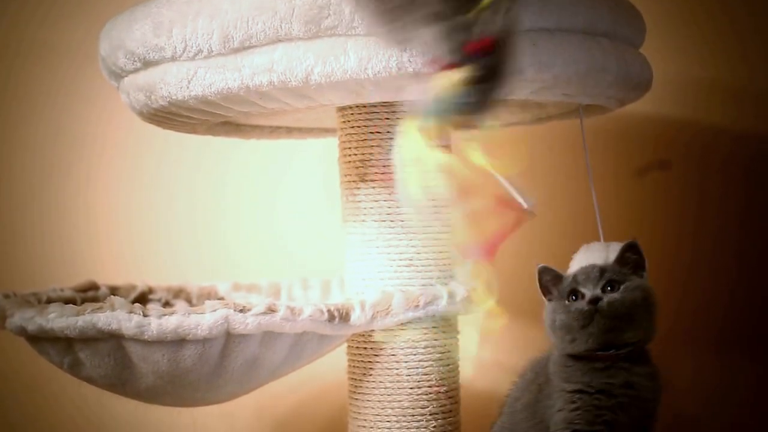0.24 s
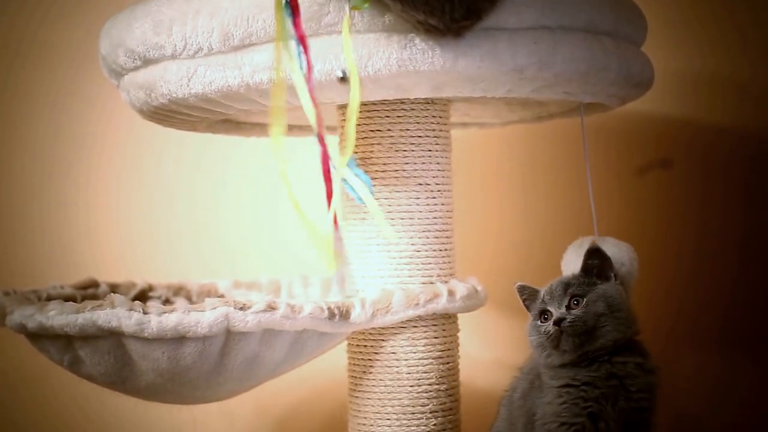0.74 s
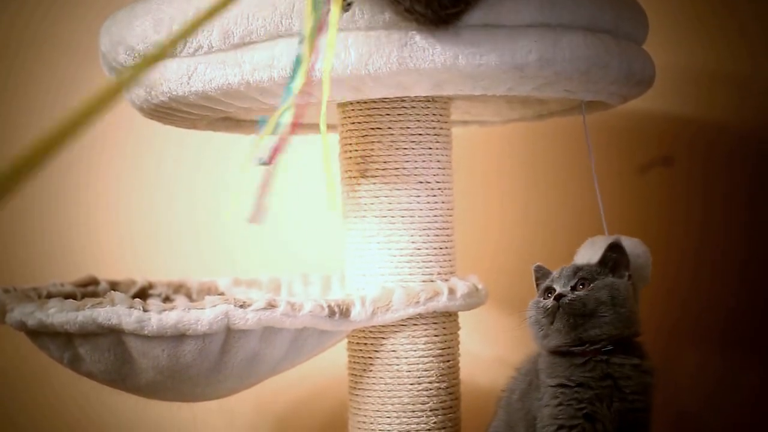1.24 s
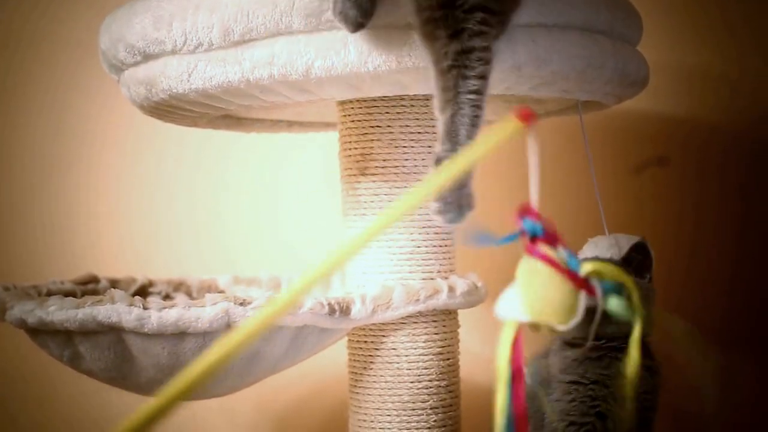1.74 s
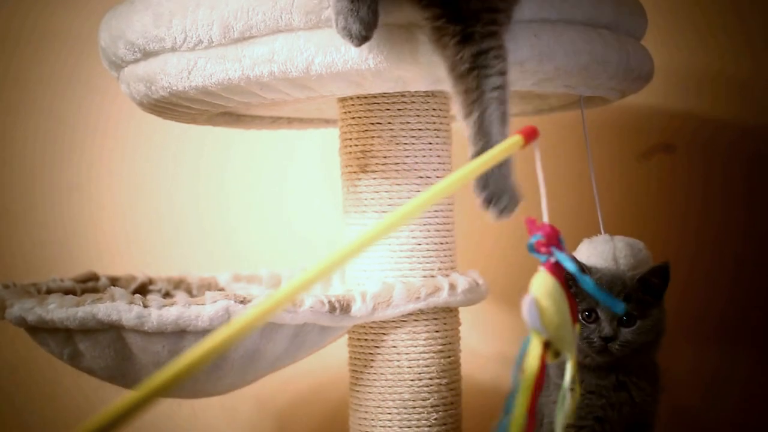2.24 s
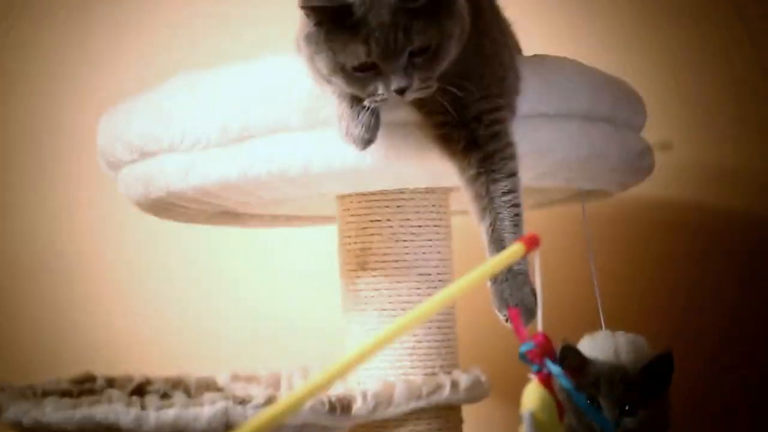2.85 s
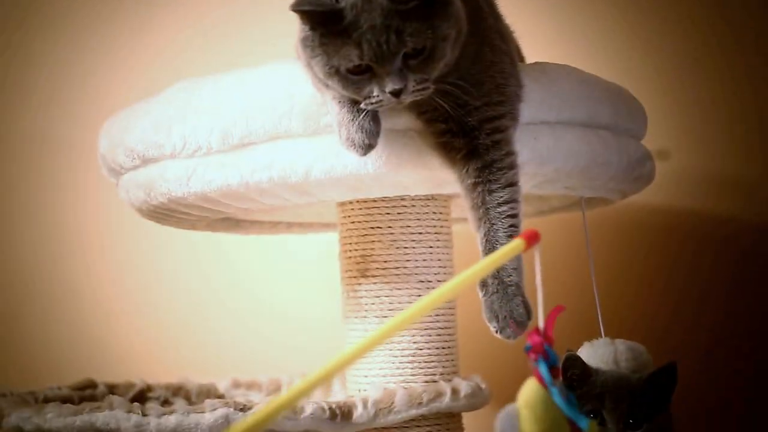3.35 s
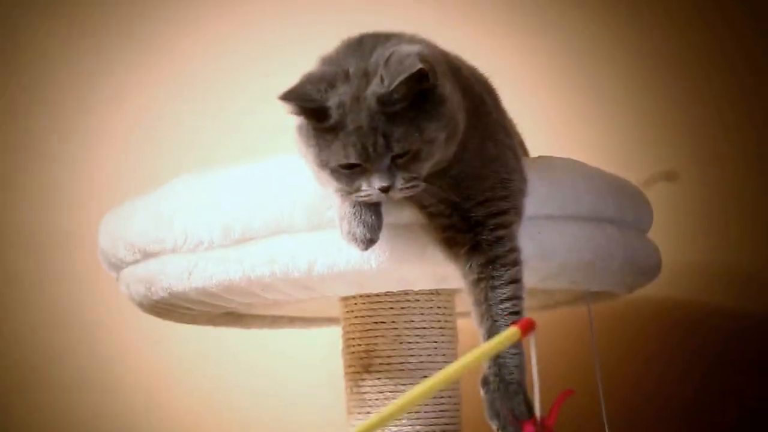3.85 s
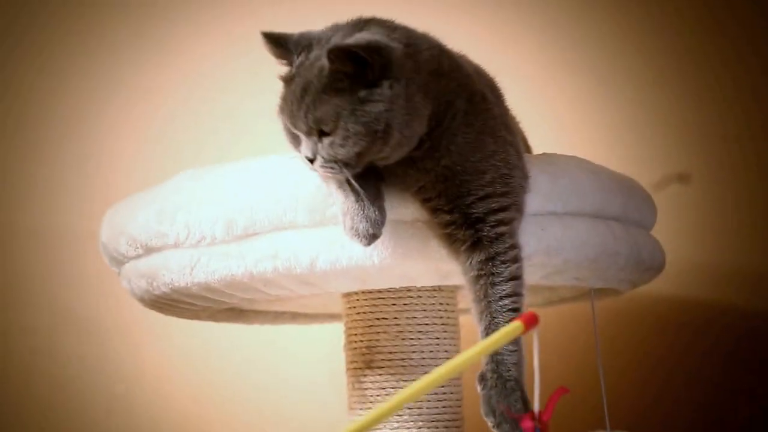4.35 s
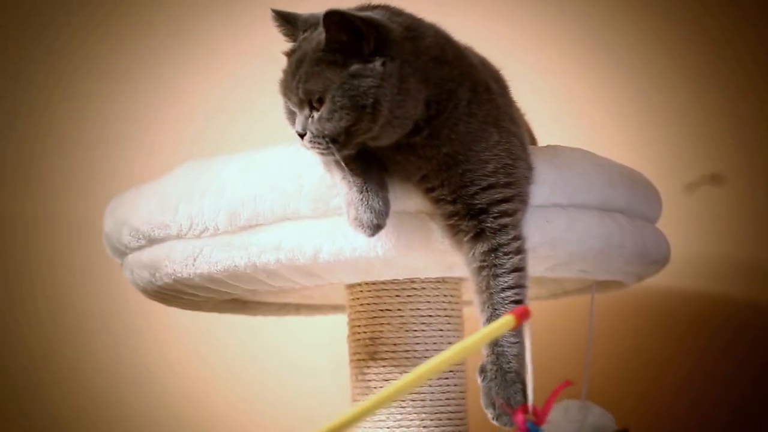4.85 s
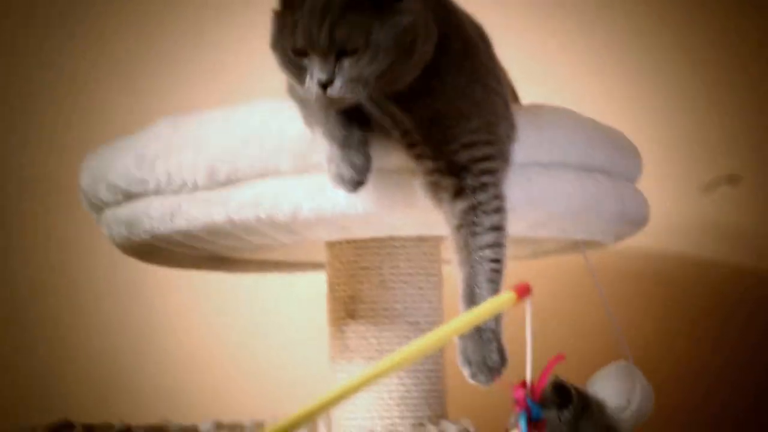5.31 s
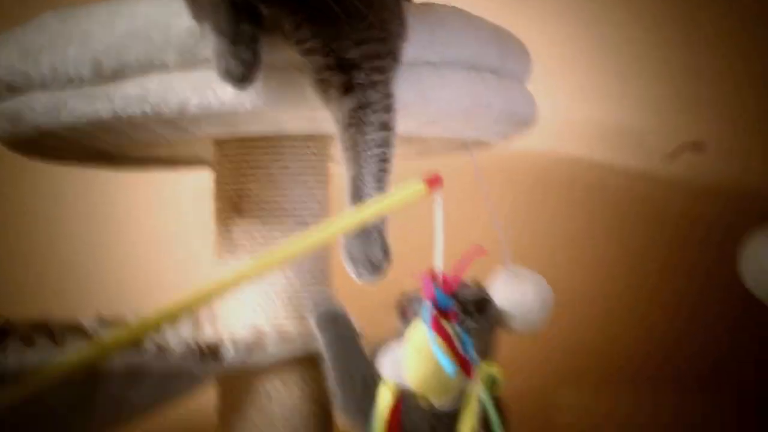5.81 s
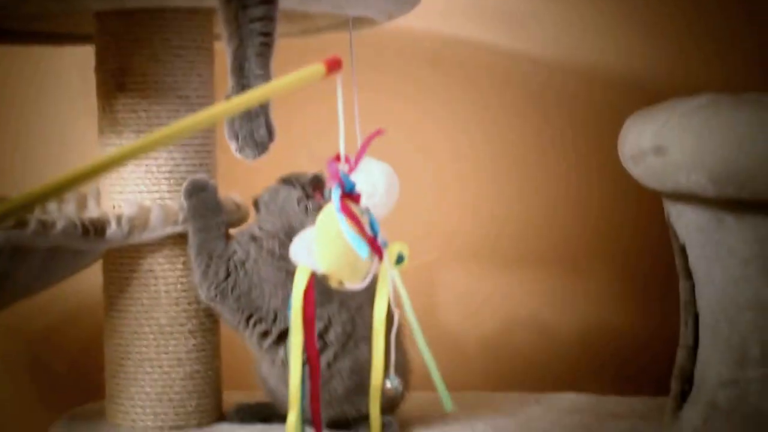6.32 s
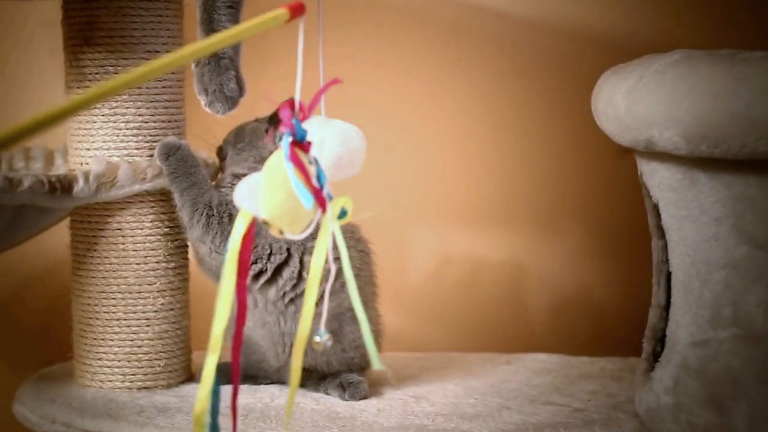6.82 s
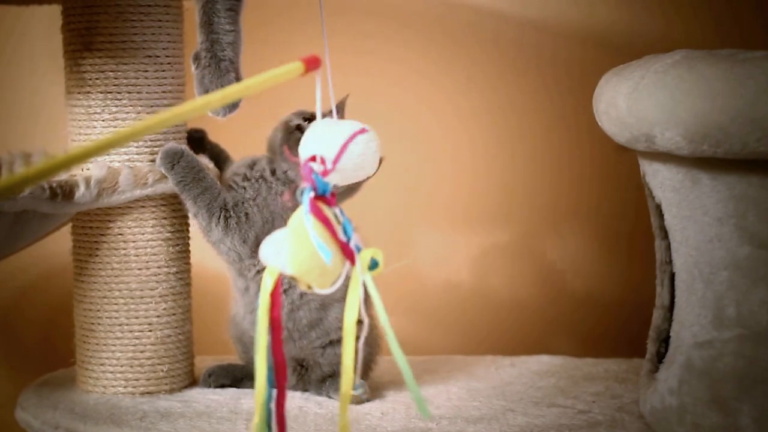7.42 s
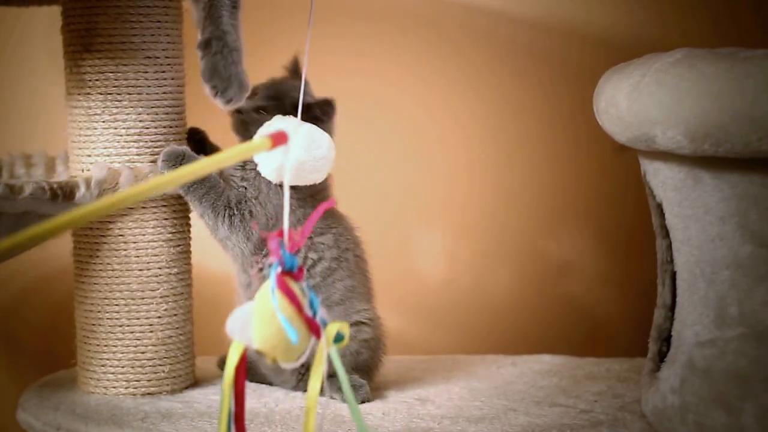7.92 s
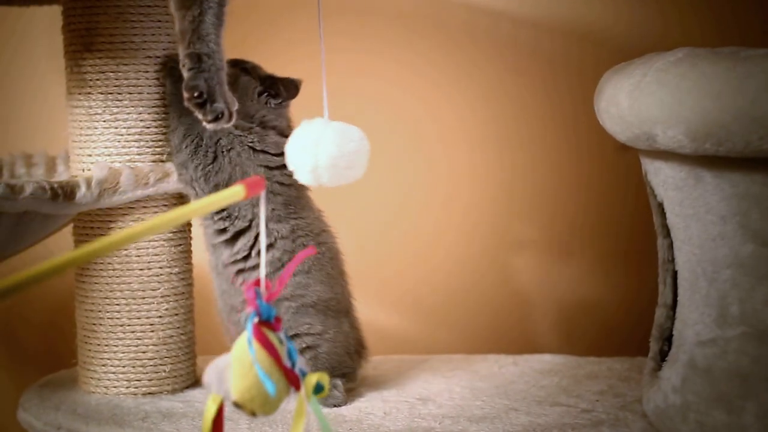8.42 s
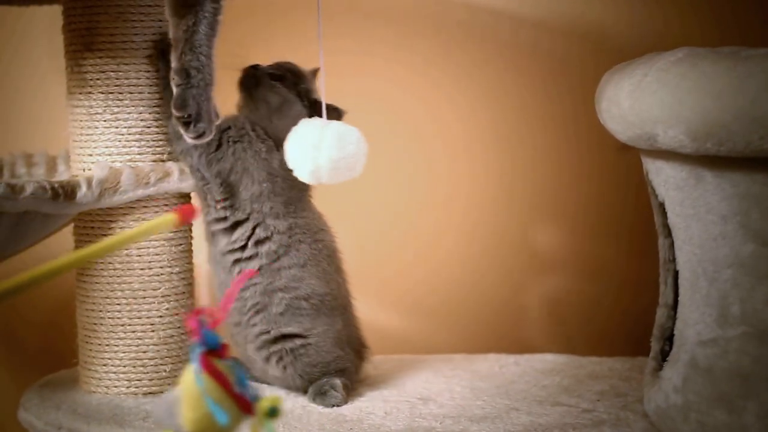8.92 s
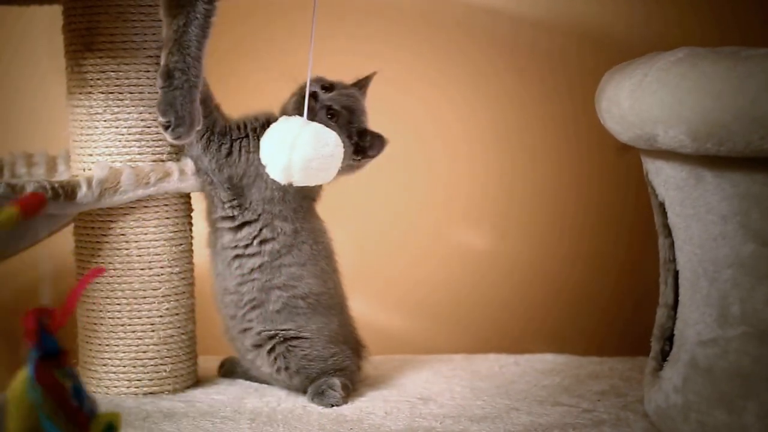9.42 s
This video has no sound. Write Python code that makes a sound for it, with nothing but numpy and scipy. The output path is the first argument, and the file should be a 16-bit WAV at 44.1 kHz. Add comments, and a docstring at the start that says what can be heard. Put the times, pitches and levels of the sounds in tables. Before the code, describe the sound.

A tiny bell on a cat toy tinkles and rattles in the first half second, again around 1.5 seconds with a soft paw thud, and faintly at 2. A wand stick taps the cat tree sharply at 2.2 seconds. At 2.8 a kitten's claw snaps loudly out of the rope post and rips briefly down it; another loud crack comes at 3.7. From about 4.4 to 6.6 seconds there is a busy flurry of claw snaps, ticks and taps, with short, stuttering, rasping rips thickest after 5.4, while the hollow post knocks along. From 7 seconds the play thins to a few light taps and muffled paw thuds, with a stick tap at 8.7 and a soft scuff on plush just after 9. Everything sounds fairly close, with a short echo in a quiet living room, over faint air hiss and a barely audible electrical whine.

```python
"""A quiet living room: kittens play with a wand toy on a cat tree.
A pellet tinkles in the toy's tiny bell and the stick taps the tree. Claws snap out of the sisal post
with a crack and rip down it in quick slips, one per turn of rope. The hollow post and its platforms
knock along, paws thud and scuff on the plush, and the walls echo over still air and a faint whine."""
import sys
import numpy as np
from scipy import signal
from scipy.fft import rfft, irfft, next_fast_len
from scipy.io import wavfile
from scipy.ndimage import uniform_filter1d, map_coordinates

SR = 44100
rng = np.random.default_rng(int(sys.argv[2]) if len(sys.argv) > 2 else 0)


def persist_wave(psi):
    """Save psi, clipped to +-1, as 16-bit WAV."""
    counts = np.round(np.clip(psi, -1, 1) * 32767).astype(np.int16)
    wavfile.write(sys.argv[1], SR, np.atleast_2d(counts).T)


N = 426178

# Modes of the post and its platforms. Each row: frequency in Hz, level in dB, t60 in seconds.
TREE_MODES = [(111.3, -31, 0.61), (140.3, -29, 0.33), (211, -18, 0.16), (260, -19, 0.078),
              (396.6, -13.5, 0.085), (520, -23.5, 0.045), (593.6, -10.5, 0.035), (763, -14.5, 0.083),
              (1190, -12, 0.068), (1413, -12.5, 0.047)]
# Colour of the sisal fibre. Each row: frequency in Hz, density in dB.
FIBRE_SPECTRUM = [(40, -45), (150, -7.5), (500, -2), (800, -1.5), (1030, -3), (1220, 1), (1600, -3.5),
                  (2100, 0.5), (2600, -1), (3300, -3), (4300, -8), (5300, -11), (6100, -24.5), (15000, -42)]
# Claw rips. Each row: start and end in seconds, slips per second, last gap over first gap, level in dB.
CLAW_DRAGS = [(2.805, 2.8448, 75, .6, -31.5), (2.8526, 2.905, 95, 1, -37), (2.927, 2.9423, 60, 1, -30.5),
              (3.7932, 3.8046, 75, 1, -30), (4.8526, 4.864, 68, 1, -28), (5.334, 5.348, 75, 1, -32.5),
              (5.391, 5.498, 47, 1.7, -26), (5.6317, 5.7183, 82, 0.97, -27),
              (5.9494, 6.0689, 76, 2.2, -24.5), (6.2538, 6.3933, 78, 1.6, -24.5),
              (6.422, 6.4488, 39, 1, -24.5), (6.4673, 6.5365, 88, 2.1, -25),
              (6.5507, 6.5776, 114, .85, -28.5)]


def amp(db):
    """Decibels to gain."""
    return 10 ** (np.asarray(db) / 20)


def unit(x):
    """Scale to rms 1."""
    return x / np.sqrt(np.mean(x ** 2) + 1e-20)


def along(points, hz):
    """Interpolate (Hz, value) points on a log frequency axis."""
    point_hz, values = np.transpose(points)
    return np.interp(np.log(hz + 1), np.log(point_hz), values)


def wobble(knots_per_s):
    """Smooth random curve."""
    knots = rng.standard_normal(int(N * knots_per_s / SR) + 4)
    return map_coordinates(knots, [np.arange(N) * knots_per_s / SR])


def add(track, start_s, sound):
    """Mix a sound into a track."""
    i = max(round(start_s * SR), 0)
    track[i:i + len(sound)] += sound[:max(N - i, 0)]


def butterworth(x, hz, kind):
    """Second-order low-pass or high-pass."""
    return signal.sosfilt(signal.butter(2, hz, kind, fs=SR, output="sos"), x)


def coloured(x, spectrum, size=4096):
    """Minimum-phase filter of energy 1, shaped by (Hz, dB) points."""
    cepstrum = irfft(np.log(amp(along(spectrum, np.fft.rfftfreq(size, 1 / SR)))))
    cepstrum[1:size // 2] *= 2
    cepstrum[size // 2 + 1:] = 0
    kernel = irfft(np.exp(rfft(cepstrum)))
    return signal.oaconvolve(x, kernel / np.linalg.norm(kernel))[:N]


def ring(times_s, levels_db, modes, detune):
    """Each blow rings the modes (Hz, dB, t60 s) at new strengths; paw load shifts their pitch a little."""
    t, track = np.arange(SR * 2 // 5) / SR, np.zeros(N)
    hz, mode_db, t60_s = np.transpose(modes)[:, :, None]
    polarity = (-1) ** np.arange(len(hz))[:, None]
    decays = polarity * amp(mode_db - 60 * t / t60_s)
    draws = rng.standard_normal((len(times_s), 2, len(hz), 1))
    for start_s, db, (strength, shift) in zip(times_s, levels_db, draws):
        phase = 2 * np.pi * hz * np.exp(detune * shift) * t
        partials = amp(db + 2 * strength) * decays * np.sin(phase.astype(np.float32))
        add(track, start_s, partials.sum(0))
    return track


def bursts(times_s, levels_db, rise_s, tail_db, tail_s, band_hz=None):
    """Each blow is a clump of tiny clicks, as of breaking fibres, that swells, stops and settles."""
    t, track = np.arange(4096) / SR, np.zeros(N)
    u = t / rise_s
    swell = u ** 2 * np.exp(2 * (1 - u))
    shape = swell + amp(tail_db - 60 * t / tail_s) * (1 - np.exp(-u))
    grit = rng.standard_normal((len(times_s), len(t))) * shape
    grit = irfft(np.exp(1j * np.angle(rfft(grit))))  # many breaks: flat spectrum
    if band_hz is not None:  # each spot favours one band
        hz = np.fft.rfftfreq(len(t), 1 / SR) + 1
        octaves = np.log2(hz / band_hz[:, None])
        grit = irfft(rfft(grit) * amp(6.5 * np.exp(-(octaves / 0.25) ** 2)))
    clumps = grit * np.sqrt(shape)  # steepens the rise and the tail
    shape_rms = np.sqrt(np.mean(shape ** 2))
    for start_s, db, clump in zip(times_s, levels_db, clumps):
        add(track, start_s, amp(db) * unit(clump) * shape_rms)
    return track


def background():
    """Still room air, hiss and a thin, wavering electrical whine."""
    # Each row: frequency in Hz, density in dB.
    air_spectrum = [(15, -61.5), (25, -29), (59, -8), (141, -11.5), (161, -6.5), (269, -7), (473, -9.5),
                    (587, -7.5), (654, -10.5), (1060, -10.5), (5980, -23.5), (9990, -24), (15800, -22)]
    # Each row: frequency in Hz, rms level in dB.
    whine_tones = [(594, -79.5), (1190, -85.5), (6718, -89.5), (10040, -84.5), (13394, -87)]
    air = amp(-65.5 + 0.33 * wobble(2.9)) * unit(coloured(rng.standard_normal(N), air_spectrum))
    whine = np.zeros(N)
    for hz, db in whine_tones:
        phase = 2 * np.pi * np.cumsum(hz + 14 * wobble(70)) / SR
        whine += amp(db) * np.sqrt(2) * np.sin(phase)
    return air + whine


def room(x, build_up_s=0.0027, blocks=24):
    """Diffuse wall echoes, with a fresh random tail per block so repeated hits ring differently."""
    # Each row: frequency in Hz, t60 in seconds.
    decay_times = [(100, 0.86), (400, 0.27), (1000, 0.4), (2200, .65), (4000, 0.59), (7000, 0.32),
                   (14000, 0.1)]
    # Each row: frequency in Hz, relative gain in dB.
    wall_spectrum = [(80, -3), (200, 1), (400, 1.5), (700, -1), (1000, 0), (2200, -3), (3200, -3),
                     (4200, -8.5), (5500, -4.5), (10000, 4.5), (15000, 0)]
    hz, t, noise = signal.stft(rng.standard_normal((blocks, SR * 3 // 4)), SR, nperseg=512)
    decay = amp(-60 * t / along(decay_times, hz)[:, None])
    tails = signal.istft(noise * decay, SR, nperseg=512)[1]
    tails *= 1 - np.exp(-(np.arange(tails.shape[1]) / SR / build_up_s) ** 2)
    wet, step = np.zeros(N), N // blocks + 1
    for k, tail in enumerate(tails):
        block = x[k * step:(k + 1) * step]
        add(wet, k * step / SR, signal.fftconvolve(block, tail / np.linalg.norm(tail)))
    return coloured(wet, wall_spectrum)


def shudders():
    """A platform hums briefly on its post as a kitten shifts its weight."""
    # Each row: start and end in seconds, frequency in Hz, level in dB.
    hums = [(2.8, 3.012, 111.2, -43), (3.69, 3.87, 109.6, -52), (5.06, 5.197, 108, -55),
            (5.37, 5.506, 108, -49), (6.191, 6.92, 71.2, -60.5)]
    track = np.zeros(N)
    for start_s, end_s, hz, db in hums:
        t = np.arange(int((end_s - start_s) * SR)) / SR
        add(track, start_s, amp(db) * signal.windows.tukey(len(t), 0.5) * np.sin(2 * np.pi * hz * t))
    return track


def paws(attack_s=0.0052, release_s=0.011, scuff_db=-21.5):
    """Paws thud on the platforms; paws and ribbons brush the plush; a pad rubs behind each dragged claw."""
    # Each row: time in seconds, level in dB.
    landings = [(1.557, -50), (7.019, -53.5), (7.719, -60), (8.319, -54), (8.693, -57), (8.988, -56),
                (9.16, -63)]
    # Each row: start and end in seconds, level in dB.
    strokes = [(1.55, 1.66, -67.5), (1.94, 2.08, -68.5), (2.64, 2.76, -68.5), (4.1, 4.22, -68),
               (7.01, 7.1, -68.5), (8.48, 8.6, -71.5), (9.1, 9.165, -53.5), (9.58, 9.65, -69)]
    # Each row: frequency in Hz, density in dB.
    plush_spectrum = [(30, -22), (60, -20), (200, 2.5), (400, -5), (720, 7), (1200, -3), (2000, -4.5),
                      (4000, -9), (6000, -30), (15000, -32)]
    thud_modes = [(51.3, -22, 0.14), (68.0, -6, 0.18), (163, -6, 0.053)]
    thuds = ring(*np.transpose(landings), thud_modes, detune=0.03)
    scuffs = [(start_s, end_s, db + scuff_db) for start_s, end_s, _, _, db in CLAW_DRAGS]
    t, pressure = np.arange(SR // 2) / SR, np.zeros(N)
    for start_s, end_s, db in list(strokes) + scuffs:
        release = np.exp(-np.maximum(t - (end_s - start_s), 0) / release_s)
        add(pressure, start_s, amp(db) * (1 - np.exp(-t / attack_s)) * release)
    friction = rng.standard_normal(N) * amp(4.35 * wobble(170))
    return thuds + pressure * unit(coloured(friction, plush_spectrum))


def bell():
    """A pellet strikes the thin shell of the toy's bell and rattles round inside it."""
    # Each row: time in seconds, level in dB, relative rattle in dB.
    strikes = [(0.1324, -39, -3), (0.1494, -49, -4), (0.2982, -37.5, 0), (0.3444, -41.5, 2),
               (1.491, -48.5, -4), (1.5594, -41.5, -8), (2.016, -51, -0.5)]
    # Each row: frequency in Hz, level in dB, t60 in seconds.
    shell_modes = [(2806, -19.5, 0.38), (4470, -7, 0.27), (4640, -10, 0.17), (5030, -4.5, 0.48),
                   (5030, -7, 0.36), (9000, -11, 0.25), (9550, -5.5, 0.16), (10000, -5, 0.31),
                   (11600, -4.5, 0.24)]
    # Each row: frequency in Hz, density in dB.
    rattle_spectrum = [(3500, -19), (4400, 1), (5100, -2), (6500, -5.5), (8500, 2), (11500, -7),
                       (13500, -38)]
    times_s, db, rattle_db = np.transpose(strikes)
    shell = ring(times_s, db - 18, shell_modes, detune=0.00307) * amp(5.8 * wobble(220))
    rattle = bursts(times_s, db + rattle_db - 13, rise_s=0.00045, tail_db=-5, tail_s=0.24)
    return shell + coloured(rattle, rattle_spectrum)


def contacts(times_s, db, knock_db, crack_db, band_hz, send_curve):
    """Sharp contacts crack and kick the post; loud ones sound drier. Returns direct sound and room send."""
    # Each row: frequency in Hz, density in dB.
    crack_spectrum = [(200, -53.5), (2200, -17.5), (4000, 15), (5100, -4), (6200, 0.5), (8000, 0),
                      (10500, -5), (13000, -10), (16000, -26.5)]
    body = bursts(times_s, db - 10, rise_s=0.0022, tail_db=-6, tail_s=0.089, band_hz=band_hz)
    crack = bursts(times_s, db + crack_db - 4, rise_s=0.0016, tail_db=-14, tail_s=0.03)
    knock = ring(times_s + 0.0015, db + knock_db + 4, TREE_MODES, detune=0.048)
    knock = butterworth(knock, 950, "lowpass")  # the rope cushions the kick
    knock = butterworth(knock, 45, "highpass")
    direct = coloured(body, FIBRE_SPECTRUM) + coloured(crack, crack_spectrum) + knock
    send_db = np.interp(db, *np.transpose(send_curve))
    latest_contact = np.clip(np.searchsorted(times_s - 0.003, np.arange(N) / SR) - 1, 0, len(db) - 1)
    send_gain = uniform_filter1d(amp(send_db)[latest_contact], size=64)
    return np.array([direct, direct * send_gain])


def stick_taps(band_hz=1970, crack_db=-37.5):
    """The wand's blunt stick knocks on the tree, always in its own band, and hardly cracks."""
    # Each row: time in seconds, level in dB, relative knock in dB.
    taps = [(1.941, -49.5, -20), (2.223, -42, -19), (2.2292, -20, -17.5), (2.451, -49, 14),
            (2.5104, -50.5, 5.5), (2.6882, -50, 3.5), (4.9813, -38.5, 1), (5.234, -35.5, -10),
            (5.7409, -34.5, 6.5), (5.8658, -31, -8), (7.0768, -33, -6), (7.2465, -37.5, 0.5),
            (7.4863, -52, 9.5), (7.5456, -44.5, -1.5), (8.6957, -34, -4), (8.979, -51, 6.5)]
    # Each row: tap level in dB, relative room send in dB.
    send_curve = [(-34, 2), (-20, -10)]
    times_s, db, knock_db = np.transpose(taps)
    return contacts(times_s, db, knock_db, crack_db, np.full(len(db), band_hz), send_curve)


def slip_times(jitter_s=0.0005, spread_db=0.7, max_slips=32):
    """A dragged claw jumps from turn to turn of unevenly wound rope. Returns times and levels."""
    times_s, levels_db = [], []
    draws = rng.standard_normal((len(CLAW_DRAGS), 2, max_slips))
    for (start_s, end_s, slips_per_s, gap_ratio, db), (lag, strength) in zip(CLAW_DRAGS, draws):
        gaps = int(np.clip(round((end_s - start_s) * slips_per_s), 1, max_slips - 1))
        elapsed = np.r_[0, np.cumsum(np.geomspace(1, gap_ratio, gaps))]
        times_s.extend(start_s + (end_s - start_s) * elapsed / elapsed[-1] + jitter_s * lag[:gaps + 1])
        levels_db.extend(db + spread_db * strength[:gaps + 1])
    return np.array(times_s), np.array(levels_db)


def slip_pushes(times_s, levels_db, push_hz=760, return_s=0.000947, return_db=-4):
    """Each slip is a dull push that returns inverted from the end of the post."""
    def pulse(u):
        return (1 - 2 * u ** 2) * np.exp(-u ** 2)

    t, track = np.arange(-SR // 250, SR // 250) / SR, np.zeros(N)
    stiffnesses = np.exp(0.13 * rng.standard_normal(len(times_s)))
    for start_s, db, stiffness in zip(times_s, levels_db, stiffnesses):
        speed = np.pi * push_hz * stiffness
        reflection = amp(return_db) * pulse(speed * (t - return_s))
        add(track, start_s + t[0], amp(db) * (pulse(speed * t) - reflection))
    return track


def claw_rips():
    """Slips push and ring the post and rasp the sisal; now and then a stiff fibre splinters."""
    # Each row: frequency in Hz, density in dB.
    splinter_spectrum = [(2000, -28), (6000, -6), (8200, 5), (9700, -9), (12000, -6), (14000, -13),
                         (16000, -30)]
    times_s, db = slip_times()
    pushes = slip_pushes(times_s, db + 1.5)
    post = butterworth(ring(times_s, db - 2, TREE_MODES, detune=0.0492), 56, "highpass")
    rasp = bursts(times_s, db - 21, rise_s=0.0023, tail_db=-22.5, tail_s=0.086)
    splinter_db = db - 34 + 5.5 * rng.standard_normal(len(db))
    splinters = bursts(times_s, splinter_db, rise_s=0.00095, tail_db=-14, tail_s=0.03)
    return pushes + post + coloured(rasp, FIBRE_SPECTRUM) + coloured(splinters, splinter_spectrum)


def snaps_and_ticks():
    """Sharp contacts on the tree: bright claw snaps, dull single slips, faint ticks and scuffs."""
    # Each row: time in seconds, level in dB, relative knock and crack in dB, favoured band in Hz.
    hits = [(0.5286, -52.5, -15, -20, 1200), (0.98, -60, -24, 3, 1040), (1.115, -63.5, -24, 5, 1500),
            (1.613, -33.5, -27, -2, 1070), (2.765, -36, -5, -12, 1500), (2.7775, -11.5, -5, -7.5, 1770),
            (2.837, -28.5, -5, -22, 1900), (3.6788, -10.5, -7, -9.5, 1920), (4.0987, -48, 0, -30, 3900),
            (4.403, -30.5, -10.5, -10, 1370), (4.514, -28, -13, -6, 2200), (4.6511, -25, -16, -10, 1410),
            (4.79, -18, -17, -9, 1290), (4.8377, -24, -6, -12.5, 2070), (5.0157, -28, -11, -20, 2510),
            (5.0433, -16.5, -6.5, -11, 1980), (5.099, -20, -8, -16.5, 1510),
            (5.2712, -16.5, -21, -12, 2150), (5.319, -27.5, 0.5, -17, 2030), (5.3581, -20.5, -3, -12, 1550),
            (5.4067, -21.5, -28, -24, 1230), (5.6073, -23, -17, -16, 1240),
            (5.6131, -18.5, -2, -11.5, 1360), (5.6616, -24, -17, -18, 1410),
            (5.88, -18.5, -21, -12.5, 1460), (5.9215, -24.5, -1.5, -7, 2900),
            (5.9284, -16, -4, -11.5, 1390), (6.183, -18.5, -13, -13.5, 1420), (6.2226, -20, -8, -15, 1580),
            (6.2367, -14, -5, -13.5, 1390), (6.4477, -26, -1, -27, 1200), (6.4745, -29.5, -16, -16, 1180),
            (7.234, -27, -17, -16, 1240), (7.2894, -34.5, -9, -12, 2110), (7.3174, -29.5, -19, -13.5, 1690),
            (9.102, -50.5, -1, -10, 740), (9.121, -54, -6, 6, 950)]
    # Each row: contact level in dB, relative room send in dB.
    send_curve = [(-56, 10.5), (-13.5, 0.5), (-8.5, -2)]
    return contacts(*np.transpose(hits), send_curve)


def scene():
    """The play, its echoes and the quiet room, in mono."""
    hits, hit_send = snaps_and_ticks() + stick_taps()
    rips = claw_rips()
    bell_and_paws = bell() + paws()
    echoes = room(amp(-9.5) * hit_send + amp(-11.5) * rips + amp(-4.5) * bell_and_paws)
    return (hits + rips + bell_and_paws + shudders() + echoes + background())[None]


def record(dry):
    """Brick-wall low-pass."""
    top_hz = 15900
    size = next_fast_len(N + SR // 4)
    passband = np.fft.rfftfreq(size, 1 / SR) < top_hz
    return irfft(rfft(dry, size) * passband, size)[..., :N]


dry = scene()
out = record(dry)
persist_wave(out)
```